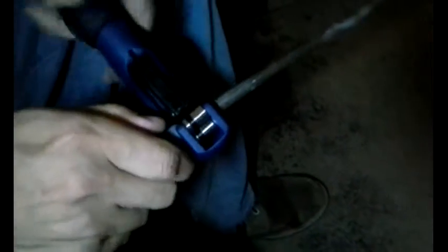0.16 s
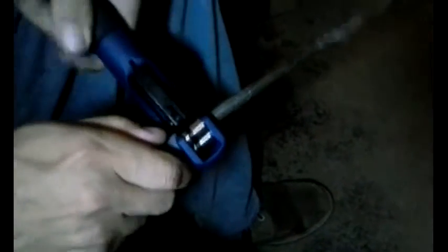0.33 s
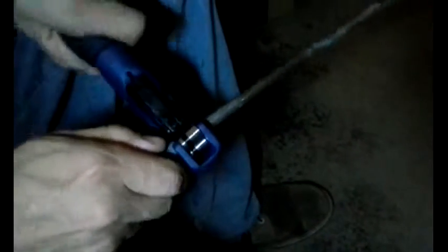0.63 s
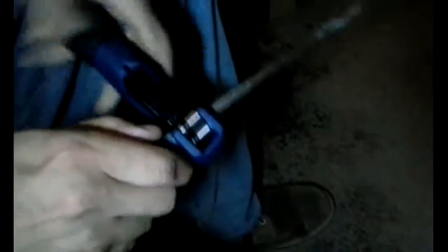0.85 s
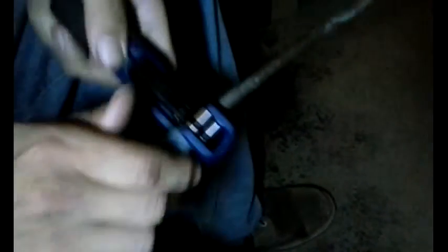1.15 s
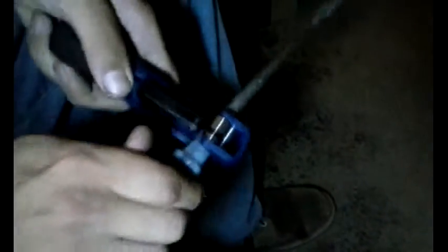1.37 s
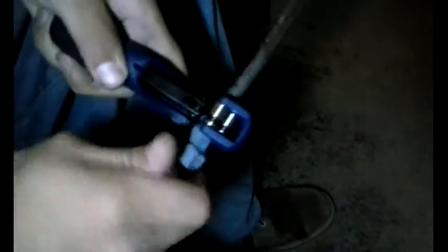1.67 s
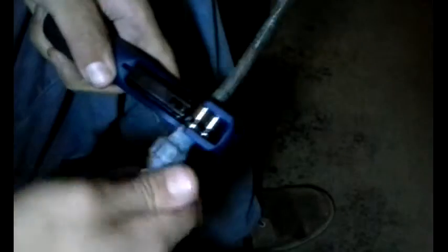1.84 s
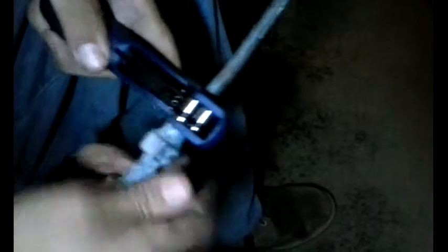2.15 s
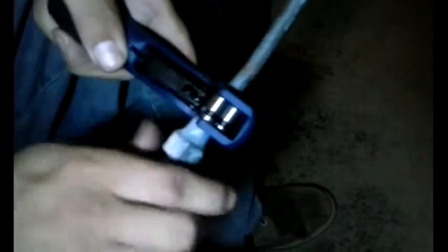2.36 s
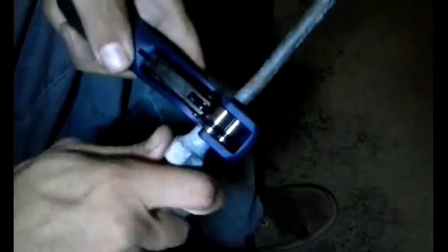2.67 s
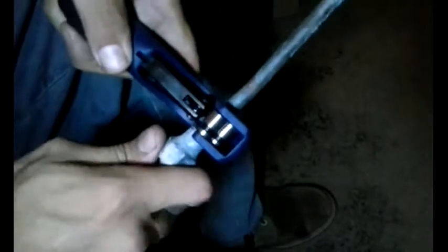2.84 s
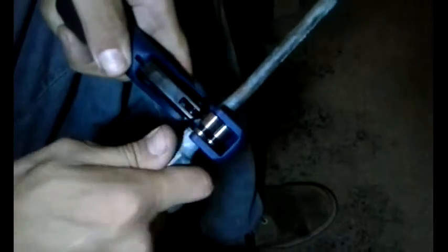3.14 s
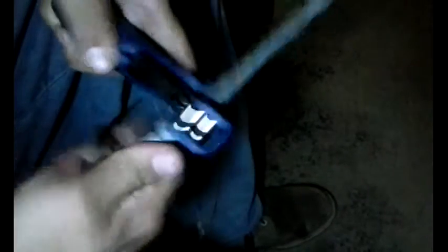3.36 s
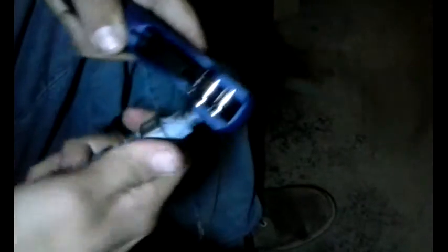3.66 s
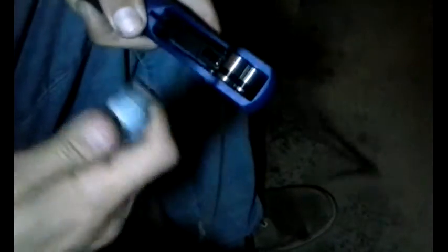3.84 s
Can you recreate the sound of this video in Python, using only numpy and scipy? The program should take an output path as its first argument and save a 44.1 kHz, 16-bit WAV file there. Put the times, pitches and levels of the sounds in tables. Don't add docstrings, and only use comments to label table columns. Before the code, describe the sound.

Close microphone in a quiet indoor workshop: soft skin and cloth strokes, a faint tool tick and brief creaks, then a sudden sharp metal clatter with short ringing, and a low double thud.

```python
import sys
import numpy as np
from scipy import signal
from scipy.fft import rfft, irfft
from scipy.io import wavfile
from scipy.ndimage import uniform_filter1d

SR = 44100
rng = np.random.default_rng(int(sys.argv[2]) if len(sys.argv) > 2 else 0)


def boost_factor(decibels):
    exponent = np.asarray(decibels, float) / 20
    return 10 ** exponent


def master_out(mix):
    frames = np.transpose(np.atleast_2d(mix))
    ceiling = np.clip(frames, -1, 1)
    pcm = np.round(ceiling * 32767).astype(np.int16)
    wavfile.write(sys.argv[1], SR, pcm)


N = 176400

# [f/Hz, level/dB]
CONTACT_COLOUR = [(500, -73), (1500, -14), (2500, -5.5), (4500, -2), (6000, -4), (9000, 4), (12000, -6.5),
                  (15500, -21)]
CONTACT_RISE_S = 0.00032
RATTLE_START_S = 3.444


def level(x, db):
    return x * boost_factor(db) / np.sqrt(np.mean(x ** 2))


def colour(x, points):
    p = np.array(points, float)
    hz = np.fft.rfftfreq(len(x), 1 / SR) + 1
    gain_db = np.interp(np.log(hz), np.log(p[:, 0]), p[:, 1])
    return irfft(rfft(x) * boost_factor(gain_db), len(x))


def band(x, hz, width_hz):
    return signal.lfilter(*signal.iirpeak(hz, hz / width_hz, SR), x)


def walk(rate_hz):
    k = int(SR / rate_hz)
    held = np.repeat(rng.standard_normal(N // k + 1), k)
    return 1.25 * uniform_filter1d(uniform_filter1d(held, k), k)[:N]


def fade(t, t60_s):
    return np.exp(-np.log(1000) * t / t60_s)


def add(out, s, x):
    i = int(s * SR)
    out[i:i + len(x)] += x[:len(out) - i]


def tube():
    # [struck near cut/dB, struck at middle/dB, t60/s]
    tube_modes = [(-14.5, -20, 0.56), (-12.5, -24, 0.63), (-16, -19, 0.76), (-9.5, -15.5, 0.47),
                  (-41, -12, 1), (-18, -13, 0.83), (-5.5, -16, 0.44), (-3.5, -4, 0.42), (-12, -0.5, 0.5),
                  (-17, -8, 0.21), (-11, -11, 0.25), (-27, -8.5, 0.31), (-19, -9, 0.27), (-24, -27, 0.27),
                  (-30, -21, .25), (-36, -19, 0.3), (-17, -22, 0.31), (-40, -41, 0.6), (-28, -36, 0.4)]
    first_hz = [3371, 3868, 4078, 5278, 6410, 6643, 7541, 8057, 9106, 9326, 9885, 10348, 10788, 12300]
    further_hz = [10573, 13091, 13887, 14533, 15250]
    # [t/s, near cut/dB, at middle/dB, choke of running ring/dB]
    blows = [(3.443, -13, -40, 3), (3.4600, -7, -32, 3), (3.4848, -21, -33, 5), (3.4924, -34, -2, 3),
             (3.5300, -7, -42, -6), (3.5365, -38, -18, 5.5), (3.5455, -21.5, -20.5, 10),
             (3.5700, -50, -61, 4.5), (3.5925, -40, -40, 2), (3.6040, -31, -49, 7.5),
             (3.833, -43, -43.5, 4)]
    tumble_db, tumble_rate_hz, tumble_from_s, tumble_grow_s = 5, 60, 3.5, 0.17
    out = np.zeros(N)
    t = np.arange(SR // 2 + SR // 10) / SR
    modes = np.array(tube_modes).astype(float)
    hz = np.concatenate([first_hz, further_hz]).astype(float)[:, None]
    start = int(blows[0][0] * SR)
    grow = np.clip((np.arange(start, N) / SR - tumble_from_s) / tumble_grow_s, 0, 1)
    wander = np.array([walk(tumble_rate_hz)[start:] for _ in hz])
    tumble = boost_factor(tumble_db * grow * wander)
    for k, (s, cut_db, mid_db, _) in enumerate(blows):
        flutter = tumble[:, int(s * SR) - start:]
        u = t[:flutter.shape[1]]
        choke_db = np.zeros(len(u))
        for later_s, _, _, taken_db in blows[k + 1:]:
            choke_db += np.clip(taken_db, 0, 40) * np.clip((u + s - later_s) / 0.003, 0, 1)
        gain = boost_factor(cut_db + modes[:, 0]) + boost_factor(mid_db + modes[:, 1])
        phase = rng.random((len(modes), 1))
        ring = flutter * fade(u, modes[:, 2:]) * np.sin(2 * np.pi * (hz * u + phase))
        add(out, s, boost_factor(-choke_db) * (1 - np.exp(-u / CONTACT_RISE_S)) * (gain @ ring))
    return out


def knocks(table, crack_db, spread=0.0299):
    out, burst = np.zeros(N), np.zeros(N)
    t = np.arange(SR // 4) / SR
    crack = fade(t, 0.024) + boost_factor(-28) * fade(t, 0.2)
    for (s, db, hz, t60_s), detune in zip(table, rng.standard_normal((len(table), 3))):
        ring = np.zeros(len(t))
        for side, d in zip((-1, 0, 1), detune):
            ring += np.sin(2 * np.pi * hz * (1 + spread * side * abs(d)) * t)
        ring /= 2 if spread else 3
        add(out, s, boost_factor(db) * ring * fade(t, t60_s) * (1 - np.exp(-t / CONTACT_RISE_S)))
        add(burst, s, boost_factor(db + crack_db) * crack)
    return out + burst * level(colour(rng.standard_normal(N), CONTACT_COLOUR), 0)


def clanks():
    # [t/s, level/dB, f/Hz, t60/s]
    strikes = [(3.4294, -13, 10240, 0.017), (3.4294, -19, 8000, 0.071), (3.4300, -31, 3580, 0.028),
               (3.4440, -0.5, 5325, 0.03), (3.4440, 2.5, 9140, 0.018), (3.4445, -8.5, 11360, 0.034),
               (3.4465, -6, 7400, 0.025), (3.4485, -0.5, 10070, 0.022), (3.4590, 2.5, 9340, 0.038),
               (3.4620, -4, 12300, 0.025), (3.4650, 1.5, 9750, 0.014), (3.4700, -3, 8260, .04),
               (3.4760, -3, 7730, .05), (3.4820, -5, 8900, .02), (3.4900, -22, 6260, .02),
               (3.4915, -8, 7670, 0.03), (3.4940, -4, 8210, 0.037), (3.5240, -10, 3900, 0.15),
               (3.5320, -10.5, 3900, 0.053), (3.5350, 0.5, 8000, 0.027), (3.5445, -5, 7470, .018),
               (3.5925, -3, 9810, 0.034), (3.5940, -10.5, 4055, 0.049), (3.5940, -25, 2220, 0.082),
               (3.5970, -19, 10200, 0.02), (3.6010, 0.5, 8880, 0.021), (3.6025, -4.5, 8390, 0.015),
               (3.6065, -21, 8000, 0.02), (3.6110, -14, 7960, 0.037), (3.8328, -10.5, 8040, 0.055),
               (3.8328, -21, 14600, 0.025), (3.8328, -23, 11900, 0.015), (3.8330, -25.5, 2730, 0.039),
               (3.8345, -23.5, 3850, 0.016), (3.8410, -20, 12400, 0.01)]
    return knocks(strikes, crack_db=-13)


def pings():
    # [t/s, level/dB, f/Hz, t60/s]
    glances = [
        (3.5310, -27, 12300, .25),
        (3.6080, -25, 12200, .06),
        (3.8410, -28, 9076, .08),
        (3.8480, -30, 7880, .04),
        (3.8555, -33, 7880, .04),
        (3.8360, -30, 6400, .04),
        (3.8410, -37, 14640, .04),
    ]
    return knocks(glances, crack_db=-30, spread=0)


def rattle():
    hold_s, t60_s = 0.1, 0.12
    t = np.arange(N) / SR - RATTLE_START_S
    env = (t > 0) * fade(np.clip(t - hold_s, 0, 1), t60_s) * boost_factor(4.4 * walk(150))
    return env * level(colour(rng.standard_normal(N), CONTACT_COLOUR), -31)


def falling():
    # [peak t/s, level/dB, f/Hz, spread/s]
    swells = [(3.78, -50, 2336, .035), (3.7, -46, 3661, .08), (3.77, -46, 3849, .06),
              (3.72, -43, 5464, .07), (3.66, -37, 6640, .05), (3.66, -34, 8052, .07),
              (3.69, -41, 7870, .06), (3.885, -39, 7880, .017), (3.878, -44, 6400, .022),
              (3.858, -40, 9076, .008), (3.805, -42, 8100, .012), (3.78, -47, 7560, .04),
              (3.84, -52, 5464, .07), (3.565, -38, 14533, .02), (3.86, -54, 12300, .025),
              (3.86, -56, 14640, .02), (3.86, -51, 9889, .025), (3.86, -52, 10330, .025),
              (3.65, -45, 3359, .05), (3.48, -20, 5278, .012)]
    flutter_db, flutter_rate_hz = 3.5, 90
    t = np.arange(N) / SR
    out = np.zeros(N)
    for s, db, hz, spread_s in swells:
        gain = boost_factor(db + flutter_db * walk(flutter_rate_hz))
        out += gain * np.exp(-((t - s) / spread_s) ** 2) * np.sin(2 * np.pi * hz * t)
    return out


def thuds():
    # [t/s, level/dB, first f/Hz, last f/Hz, t60/s]
    impacts = [
        (3.833, -5, 500, 305, 0.026),
        (3.8330, -19, 860, 800, 0.03),
        (3.836, 3.5, 310, 71, 0.048),
        (3.847, -13, 69.4, 67, 0.11),
        (3.8510, -10, 180, 173, 0.051),
        (3.897, -18, 92.5, 60.4, 0.067),
        (3.959, -9.5, 663, 448, 0.0063),
        (3.9578, -23.5, 1070, 880, 0.034),
    ]
    out, patter = np.zeros(N), np.zeros(N)
    t = np.arange(SR // 4) / SR
    for s, db, hz, end_hz, t60_s in impacts:
        sag_s = 0.13 * t60_s
        turns = end_hz * t + (hz - end_hz) * sag_s * (1 - np.exp(-t / sag_s))
        rise = (1 - np.exp(-t / (0.1 * t60_s))) ** .5
        add(out, s, boost_factor(db) * rise * fade(t, t60_s) * np.sin(2 * np.pi * turns))
    add(patter, impacts[0][0], fade(t, 0.19))
    add(patter, impacts[-2][0], .5 * fade(t, 1.0))
    dull = colour(rng.standard_normal(N), [(60, 8.5), (150, 12), (900, 1), (1300, -28), (3000, -38)])
    return out + patter * level(dull, -30)


def rubbing():
    # [peak t/s, rise/s, fall/s, level/dB]
    strokes = [(.14, 0.054, 0.088, -49.5), (.6, 0.068, 0.088, -55.5), (.75, 0.015, 0.011, -53.5),
               (0.884, 0.012, 0.069, -46.5), (1.05, 0.039, 0.25, -50), (1.83, 0.021, 0.03, -51.5),
               (1.98, 0.12, 0.078, -49.5), (2.025, .03, .02, -56.5), (2.07, 0.05, 0.047, -42.5),
               (2.14, 0.04, 0.038, -50), (2.2, 0.026, .025, -46), (2.243, 0.022, 0.02, -44.5),
               (2.295, 0.023, 0.024, -50.5), (2.3, 0.089, 0.13, -48), (2.75, 0.068, 0.12, -56.5),
               (3.07, 0.011, 0.089, -49), (3.4, 0.048, 0.13, -48), (3.97, 0.069, .1, -49.5)]
    # [f/Hz, level/dB]
    cloth_colour = [(1500, -6.5), (3000, -12.5), (5000, -23), (6500, -11.5), (8000, 2.5), (9500, -7),
                    (11000, -9.5), (15500, -21.5)]
    t = np.arange(N) / SR
    hand = np.zeros(N)
    for s, rise_s, fall_s, db in strokes:
        hand += boost_factor(db) * np.exp(-np.where(t < s, (s - t) / rise_s, (t - s) / fall_s) ** 2)
    grain_db = 2.0 * rng.exponential(size=N) + 1.5 * walk(90)
    grains = rng.standard_normal(N) * boost_factor(grain_db)
    return level(colour(grains, cloth_colour), 0) * hand


def ticks():
    # [t/s, level/dB, f/Hz, t60/s]
    clicks = [
        (1.006, -35, 2120, 0.033),
        (1.028, -46, 3500, 0.025),
        (1.035, -32, 3430, 0.015),
        (1.0355, -34, 8000, .012),
        (1.040, -45, 3500, .02),
        (2.094, -37, 8200, .012),
        (3.065, -43, 9950, 0.049),
    ]
    return knocks(clicks, crack_db=-30)


def creaks():
    # [start t/s, length/s, level/dB]
    slides = [
        (2.07, 0.07, -39.5),
        (2.225, 0.047, -45),
        (2.264, 0.036, -45),
    ]
    # [f/Hz, width/Hz, level/dB]
    rollers = [(877, 35, 11.5), (1685, 74, 11.5), (2280, 96, 1), (3900, 220, -31)]
    slip_rate_hz = 400
    slips = (rng.random(N) < slip_rate_hz / SR) * rng.standard_normal(N)
    slips = slips + 0.1 * rng.standard_normal(N)
    body = level(sum(boost_factor(db) * band(slips, hz, width_hz) for hz, width_hz, db in rollers), 0)
    env = np.zeros(N)
    for s, length_s, db in slides:
        add(env, s, boost_factor(db) * np.hanning(int(length_s * SR)))
    return env * body


def room(x):
    t = np.arange(SR // 2) / SR
    tail = rng.standard_normal(len(t)) * fade(t, 0.9) * np.clip(t / 0.015, 0, 1)
    tail = level(tail, -28) / np.sqrt(len(t))
    tail = colour(tail, [(4000, 0), (9000, -5), (13000, 4), (16000, 8)])
    return x + signal.fftconvolve(x, tail)[:N]


def air():
    # [f/Hz, density/(dB per Hz)]
    air_colour = [(18, -60), (30, -73), (64, -4.5), (303, -8.5), (1810, -8), (2350, -8), (5040, -46),
                  (8300, -19), (16000, -46)]
    # [f/Hz, width/Hz, level/dB]
    hums = [(71.4, 3.3, -59.5), (130, 13.5, -56.5), (310.6, 58, -54), (693, 80, -59), (943, 56, -55.5),
            (1570, 59, -66.5), (2364, 166, -60.5), (2873, 250, -64), (3880, 220, -70.5), (8000, 690, -61.5),
            (10500, 1800, -61.5)]
    rustle = np.zeros(N)
    for hz in 45 * np.sqrt(2) ** np.arange(18):
        swell_db = np.clip(3000 / hz, .3, 1) * (3.74 * walk(12) + 1.6 * walk(3.35))
        rustle += band(rng.standard_normal(N), hz, hz / 3) * boost_factor(swell_db) / np.sqrt(hz)
    out = level(colour(rustle, air_colour), -49)
    for hz, width_hz, db in hums:
        waver_db = 3.25 * np.clip(3000 / hz, .3, 1) * walk(14)
        out = out + level(band(rng.standard_normal(N), hz, width_hz), db) * boost_factor(waver_db)
    return out


def scene():
    duck_db, duck_hold_s, duck_back_s = 2, 3.8, 0.1
    t = np.arange(N) / SR
    recover = np.exp(-np.clip(t - duck_hold_s, 0, 1) / duck_back_s)
    duck = boost_factor(-duck_db * (t > RATTLE_START_S) * recover)
    metal = tube() + clanks() + pings() + rattle() + falling() + ticks()
    return (room(metal) + thuds() + rubbing() + creaks() + duck * air())[None]


def top_cut(x):
    return signal.sosfilt(signal.butter(12, 16410, fs=SR, output="sos"), x)


def record(dry):
    ceiling = 0.92
    dry = signal.sosfilt(signal.butter(2, 49, "high", fs=SR, output="sos"), dry)
    dry = signal.sosfilt(signal.ellip(12, .2, 60, 15750, fs=SR, output="sos"), dry)
    return top_cut(ceiling * np.tanh(dry / ceiling))


dry = scene()
out = record(dry)
master_out(out)
```